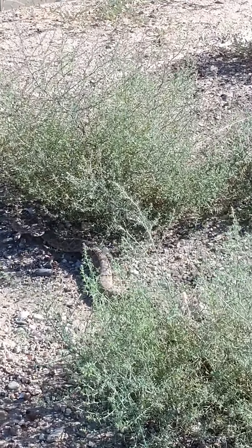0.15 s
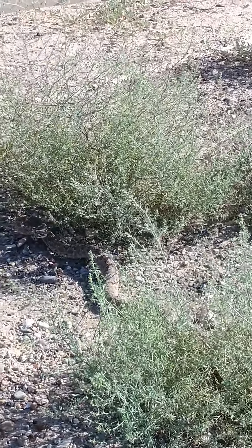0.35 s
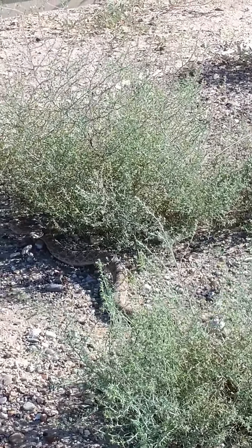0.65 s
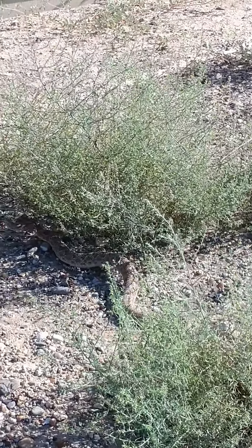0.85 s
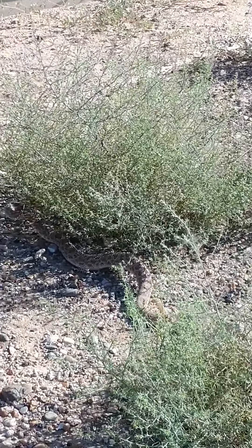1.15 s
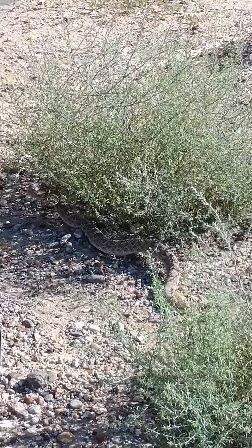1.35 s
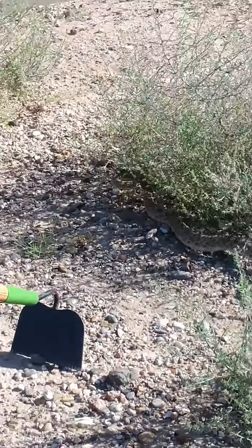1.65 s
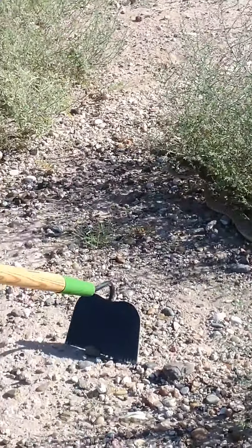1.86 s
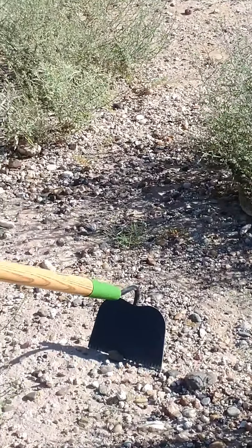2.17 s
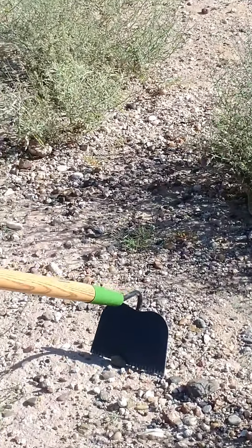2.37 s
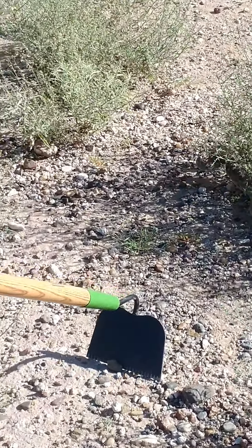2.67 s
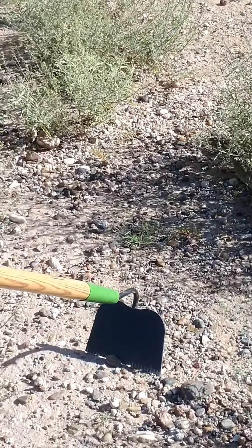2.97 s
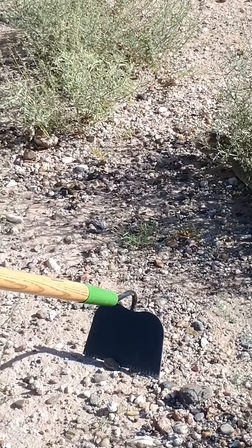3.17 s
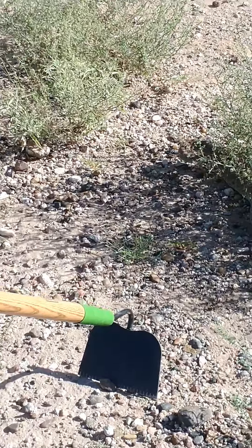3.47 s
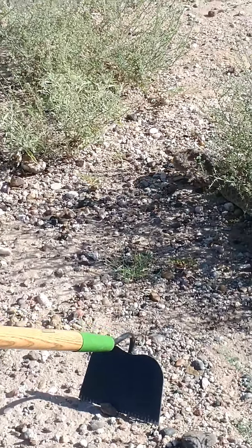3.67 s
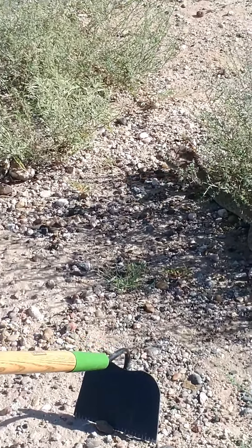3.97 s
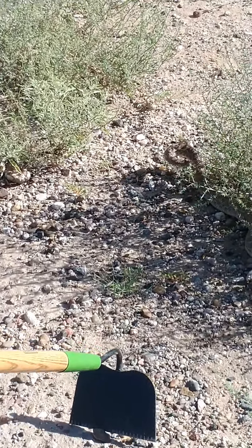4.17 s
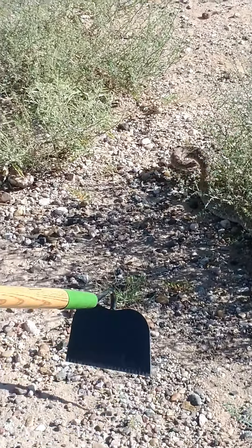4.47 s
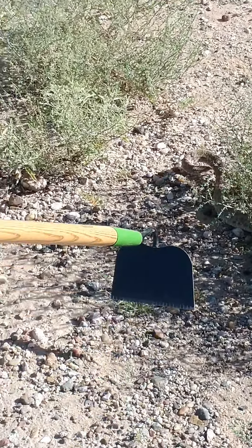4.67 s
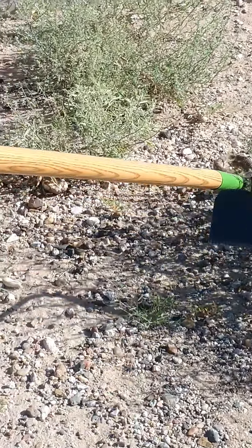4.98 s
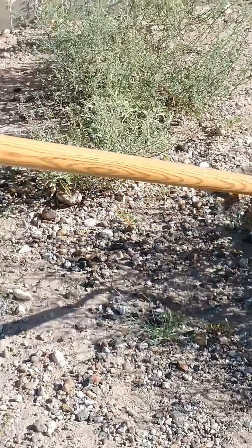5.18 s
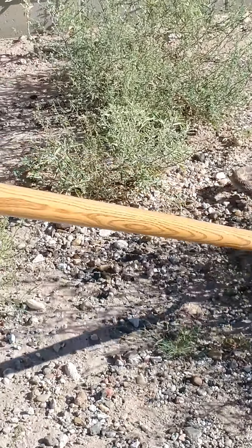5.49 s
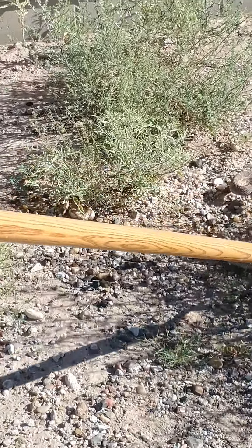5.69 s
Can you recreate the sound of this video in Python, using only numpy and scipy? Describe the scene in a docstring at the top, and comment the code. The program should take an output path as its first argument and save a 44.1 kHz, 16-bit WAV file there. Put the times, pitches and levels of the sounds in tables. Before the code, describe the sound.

Steady dry, shrill snake rattle, close and bright, with scattered stone clicks, brief gravel crunches and soft wooden handle knocks.

```python
"""A rattlesnake under a desert bush shakes its rattle a couple of metres from a hand-held phone.
Hollow horn segments clack twice per tail swing: random impacts follow the swing into a resonant, dense buzz,
which twigs and ground scatter as the phone turns. Gravel clicks as dying bursts and crunches as crowds of grains
under feet, a tool handle knocks softly in a few decaying modes, and a low distant rumble of filtered noise,
with a far engine drone in narrow bands, fills the open air."""
import sys
import numpy as np
from scipy import signal
from scipy.fft import rfft, irfft, next_fast_len
from scipy.io import wavfile
from scipy.ndimage import uniform_filter1d, map_coordinates

SR = 44100
rng = np.random.default_rng(int(sys.argv[2]) if len(sys.argv) > 2 else 0)


def dump_mix(stems):
    """Bounce the given channels to the path in sys.argv[1] as a 16-bit WAV at rate SR."""
    frames = np.atleast_2d(stems).T  # one column per channel
    limited = np.clip(frames, -1, 1)  # hard clip at full scale
    pcm = np.round(limited * 32767).astype(np.int16)
    wavfile.write(sys.argv[1], SR, pcm)


def gain_from_decibels(decibels):
    """Convert decibel values to linear amplitude factors."""
    exponent = np.asarray(decibels, float) / 20
    return 10 ** exponent


N = 257390
T = np.arange(N) / SR
M = next_fast_len(N + 4096)
HZ = np.arange(M // 2 + 1) * SR / M

# how the phone points: [t/s, left minus right/dB, phase by which the left leads at 5500 Hz/rad]
PHONE_AIM = [(0, 4.6, -1.3), (.7, 6.2, -1.3), (1.2, 4.4, -2.3), (1.9, 3.6, -2.5), (2.8, 3.9, -2.5),
             (3.5, 5.7, -1.8), (3.9, 3.9, -2), (4.6, 3.7, -1), (5.15, 5.9, -1.4), (5.84, 3, -2.7)]


def level(x, db):
    """Root-mean-square normalisation: scale to a level in dB, fixed or moving."""
    return x * gain_from_decibels(db) / np.sqrt(np.mean(x ** 2))


def along(table, column=1):
    """Logarithmic frequency scale: read a table column at every frequency, straight between its rows."""
    rows = np.array(table, float)
    return np.interp(np.log(HZ + 1), np.log(rows[:, 0] + 1), rows[:, column])


def shape(x, gain):
    """Linear filtering: multiply the spectrum by a gain at every frequency."""
    return irfft(rfft(x, M) * gain, M)[..., :N]


def walk(rate):
    """Slow random modulation: levels held 1 / rate s and slewed twice; spread near 1."""
    k = int(SR / rate)
    held = np.repeat(rng.standard_normal(N // k + 1), k)
    return 1.595 * uniform_filter1d(uniform_filter1d(held, k), k)[:N]


def clicks(per_s, spread_db):
    """Random impact process: chance hits of nearly even strength and random sign."""
    hit, size, sign = rng.random((3, N))
    strength = gain_from_decibels(-spread_db * np.log(size + 1e-9))
    return (hit < per_s / SR) * strength * np.sign(sign - .5)


def scattered(x, t60, turn_rate, count=4):
    """Multiple scattering: decaying echoes off twigs and stones, whose pattern shifts as the phone turns."""
    t = np.arange(2048) / SR
    echoes = rng.standard_normal((count, 2048)) * np.exp(-np.log(1000) * t / t60)
    echoes = echoes / np.sqrt(np.sum(echoes ** 2, 1, keepdims=True))
    paths = shape(x, rfft(echoes, M))
    weights = np.array([walk(turn_rate) for _ in range(count)])
    return np.sum(weights * paths, 0) / np.sqrt(np.sum(weights ** 2, 0))


def tail_beat():
    """Periodic excitation: a clack at each end of the swing, one end harder than the other."""
    # pace of the tail, two clacks per swing: [t/s, clack rate/Hz]
    pace = [(0, 146), (1.1, 145), (1.7, 149), (2.4, 146), (3.0, 143), (3.4, 146), (4.2, 140), (4.45, 142),
            (4.6, 157), (5.3, 159), (5.84, 150)]
    rate = np.interp(T, *np.transpose(pace)) * (1 + .025 * walk(20))
    phase = 2 * np.pi * np.cumsum(rate) / SR
    return 1.5 * np.tanh(1.5 * (np.cos(phase) + .6 * np.cos(phase / 2) + .4))


def segment_spectrum():
    """Impact and resonance: loose segments strike, their horn colours the sound, each port hears its own mix."""
    # resonant colour of the segments at the two ports: [f/Hz, left relative level/dB, right relative level/dB]
    shell = [(2500, -25, -23), (3500, -43, -22), (3680, -38, -30.5), (4660, -19.5, -21), (5150, -7, -13),
             (5355, 0, -5), (5960, -3, -7), (6040, -5.5, -11), (6710, -17, -13.5), (7610, -18, -16.5),
             (8500, -19.5, -15), (9000, -22, -21), (9340, -33.5, -26), (11600, -42, -38.5),
             (13900, -37, -31), (17200, -35.5, -40)]
    # phase between the ports apart from the aim: [f/Hz, phase by which the left leads/rad]
    port_lead = [(2500, 1.2), (4600, 1.2), (5500, 0), (6000, -.6), (8400, -.6), (10200, -5), (12000, -11),
                 (15300, -19)]
    # share that differs between the ports, other segments and twig echoes: [f/Hz, level against direct/dB]
    scatter_share = [(2500, 3), (4500, -5), (5600, -7), (6200, -2), (6600, 4), (7600, -1), (9000, 2),
                     (15000, 3)]
    hits, *others = (clicks(6000., .35) * gain_from_decibels(.3 * walk(25)) for _ in range(3))
    # nearby stems comb the ring alike for both ports; their echo is dull
    dull = .5 / (1 + (HZ / 7000) ** 8)
    hits = hits + shape(scattered(hits, .045, 1.5, count=3), dull)
    s, _, lead = np.transpose(PHONE_AIM)
    shift = np.interp(T, s, lead) / (4 * np.pi * 5500) * SR  # samples each port moves as the phone turns
    direct = np.array([map_coordinates(hits, [np.arange(N) + side * shift], order=5) for side in (1, -1)])
    apart = np.array([.3 * scattered(hits, .03, 3.) + .9 * other for other in others])
    share = gain_from_decibels(along(scatter_share))
    bass_cut = np.minimum(HZ / 3904.0, 1) ** 12
    colour = gain_from_decibels(np.array([along(shell, column=1), along(shell, column=2)])) * bass_cut
    ports = np.exp(1j * np.outer([.5, -.5], along(port_lead)))
    return (rfft(direct, M) * ports + share * rfft(apart, M)) / np.sqrt(1 + share ** 2) * colour


def ring_out(spectrum):
    """Narrow-band resonance: segments ring out, or cancel below 0 dB, while tail and phone hold one pose."""
    # [start t/s, end t/s, f/Hz, width/Hz, left gain/dB, right gain/dB]
    poses = [(0, .9, 3680, 250, -8, -14), (0, 0.885, 4660, 200, -1, -0.5), (0, 0.845, 4320, 157, 8, 2.5),
             (0.143, 0.86, 5080, 240, 1, -0.5), (0, 0.25, 4960, 149, 3, 4.5),
             (0, 1.453, 5805, 164, 7.5, 6.5), (0, 1, 4440, 120, -10, -3), (0, 0.902, 5600, 112, -8, -3),
             (0, 0.922, 5980, 335, -13.5, -10), (0, .9, 6740, 406, 7.5, 5.5), (0, 1.4, 6450, 120, 2.5, 3),
             (0, 0.902, 8550, 302, -1, 6), (.3, .88, 8600, 300, -4.5, 2), (1.39, 3.85, 5420, 208, 8, 7.5),
             (1.497, 3.793, 5300, 156, -0.5, 4.5), (1.71, 3.64, 6180, 298, 2.5, 3.5),
             (3.3, 5.304, 6010, 131, -3.5, -15), (3.397, 3.845, 6500, 195, 9.5, 9.5),
             (3.595, 5.3, 6400, 149, -5, 3), (1.5, 3.3, 6530, 228, 1, 0.5),
             (1.502, 3.3, 8950, 200, 5, -5.5), (3.844, 4.263, 5660, 204, 5, 5),
             (4.147, 5.355, 5460, 268, 1, 2), (3.64, 4.13, 7150, 250, 10.5, 3),
             (3.4, 5.25, 8400, 250, 5.5, 4), (4.36, 4.998, 6830, 194, 9.5, -1),
             (2.3, 5.3, 9165, 110, 6.5, 7)]
    pose_change_s = 0.14
    out = irfft(spectrum, M)[:, :N]
    for start, end, hz, width, *db in poses:
        held = np.clip(np.minimum(T - start, end - T) / pose_change_s + .5, 0, 1)
        band = irfft(spectrum / (1 + (2 * (HZ - hz) / width) ** 2), M)[:, :N]
        out = out + held * (gain_from_decibels(np.array(db))[:, None] - 1) * band
    return rfft(out, M)


def band_levels():
    """Spectral envelope: times and the levels of six bands, from the lowest up, before the overall gain."""
    # the three main bands: [t/s, ring level/dB, low flank level/dB, treble level/dB]
    main_bands = [(0, -37.5, -56, -59.5), (.08, -40.5, -48, -61.5), (.25, -48, -49, -60.5),
                  (.4, -44.5, -48, -59), (.6, -42.5, -43, -59), (.8, -37.5, -45, -58),
                  (.845, -44, -55, -57), (.88, -55, -54.5, -64), (1.04, -58.5, -59, -62.5),
                  (1.17, -46, -59, -58), (1.4, -49, -55, -63.5), (1.55, -44.5, -55, -58.5),
                  (1.8, -51.5, -56.5, -62), (2.0, -49, -55.5, -61), (2.35, -47.5, -57.5, -60),
                  (2.5, -47.5, -59, -60), (2.65, -52.5, -58.5, -58.5), (3.0, -44, -56.5, -58),
                  (3.27, -45.5, -56.5, -58), (3.5, -42.5, -48.5, -56.5), (3.65, -40.5, -49.5, -58),
                  (3.8, -43.5, -59.5, -59), (3.92, -48, -58.5, -58), (4.05, -39.5, -55, -57),
                  (4.12, -36.5, -51, -57.5), (4.19, -39, -50.5, -60.5), (4.35, -36.5, -47, -56.5),
                  (4.58, -35, -49, -55.5), (4.68, -38.5, -52.5, -56), (4.8, -38.5, -49, -53.5),
                  (4.95, -36.5, -43, -55), (5.24, -38, -49.5, -57.5), (5.3, -46, -57, -64),
                  (5.5, -43, -50.5, -65.5), (5.6, -48.5, -58, -63.5), (5.75, -54.5, -60.5, -67.5),
                  (5.84, -41.5, -58, -61.5)]
    # extra level of the lowest band and the upper flank: [t/s, lowest band level/dB, upper flank level/dB]
    extra_levels = [(0, 1, 1), (.7, -1, 2), (1.2, 1, -2), (1.6, -2.5, 2), (2.6, -0.5, -1.5), (3.1, -3, 1.5),
                    (3.6, -5, -0.5), (3.85, 1.5, 6.5), (4.3, 0.5, -3), (4.75, -4.5, 3), (5.0, -5, -5.5),
                    (5.3, 1.5, 2.5), (5.84, -2.5, -1)]
    s, ring, low, treble = np.transpose(main_bands)
    when, foot_db, upper_db = np.transpose(extra_levels)
    # the lowest band follows the low flank, more steeply
    foot = -59 + 1.23 * (low + 48.5) + np.interp(s, when, foot_db)
    sizzle = treble + 2
    # the upper flank lies between ring and sizzle
    upper = -0.5 + .33 * ring + (1 - .33) * sizzle + np.interp(s, when, upper_db)
    return s, (foot, low, ring, upper, sizzle, treble)


def even_strokes(x, throw_db=3.5):
    """Amplitude limitation: a segment can only swing so far, so strokes even out above the running level."""
    power = np.mean(x ** 2, 0)
    stroke = uniform_filter1d(uniform_filter1d(power, size=40), size=40) / uniform_filter1d(power, size=3000)
    return x * (1 + (stroke * gain_from_decibels(-2 * throw_db)) ** 2) ** -.2


def brief_fades():
    """Envelope modulation: the rattle briefly fades and swells back, in dB."""
    # [deepest t/s, fading time/s, recovery time/s, depth level/dB]
    dips = [(4.14, 0.02, 0.031, -17), (5.273, 0.016, 0.025, -13.5), (5.395, 0.017, 0.017, -9.5),
            (5.535, 0.032, 0.03, -10.5), (5.61, 0.044, 0.034, -11.5), (5.685, 0.049, 0.012, -12)]
    return sum(np.interp(T, (at - fading, at, at + recovery), (0, db, 0))
               for at, fading, recovery, db in dips)


def rattle():
    """Amplitude-modulated resonant noise: bunched segment impacts beat in six bands with the tail."""
    # edges between the six bands: [f/Hz]
    edges_hz = [4500, 5150, 6020, 6900, 9600]
    # depth of the beat from the lowest band up; the thin treble sizzles evenly: [level per unit beat/dB]
    beat_depths = [1.0, 1.9, 2.1, 1.3, .9, .4]
    beat = tail_beat()
    spectrum = ring_out(segment_spectrum())
    above = [1, *(1 / (1 + (edge / (HZ + 1)) ** 60) for edge in edges_hz), 0]
    s, levels = band_levels()
    out = 0
    # the ground echo and the turning phone favour now one part of the spectrum, now another
    for a, b, db, depth_db in zip(above, above[1:], levels, beat_depths):
        part = irfft(spectrum * (a - b), M)[:, :N]
        waver_db = .8 * walk(16)  # each part wavers on its own
        out = out + level(part, np.interp(T, s, db) + depth_db * beat + waver_db)
    out = even_strokes(out)
    s, pan_db, _ = np.transpose(PHONE_AIM)
    turn_db = .5 * (np.interp(T, s, pan_db) - pan_db.mean())
    return out * gain_from_decibels(1 + brief_fades() + np.array([turn_db, -turn_db]))


def shuffle():
    """Energy summation: power of middle, coarse and sand grains under shifting feet, creep plus scuffs."""
    # slow creep of the gravel: [t/s, middle grain level/dB, sand level/dB]
    creep = [(0, -78, -79), (0.297, -87, -80), (0.748, -78.5, -79), (1.1, -82.5, -68.5),
             (1.398, -72.5, -71), (1.9, -73, -71.5), (2.3, -78.5, -73), (2.549, -72, -70.5),
             (3.1, -71.5, -73.5), (3.3, -69, -72.5), (3.602, -68.5, -70.5), (3.85, -76, -73.5),
             (4.2, -77, -83), (4.555, -71.5, -73), (4.902, -78, -75), (5.104, -84.5, -91),
             (5.402, -76, -73), (5.84, -87, -76.5)]
    # [start t/s, length/s, middle level/dB, coarse level against middle/dB, sand level against middle/dB]
    scuffs = [(1.231, .065, -70, 6, 3), (1.545, .07, -74.5, 7, -8), (2.849, .02, -67.5, -21, -12),
              (3.285, .04, -71.5, -15, 3), (4.278, 0.037, -61.5, -10, -6), (4.346, .045, -64.5, -11, -11.5),
              (4.426, .025, -66.5, -5, -10), (5.226, .04, -65, 0.5, -2)]
    attack_s, release_s = 0.0057, 0.028
    s, middle, sand = np.transpose(creep)
    coarse = middle - 5.5
    power = gain_from_decibels(2 * np.array([np.interp(T, s, db) for db in (middle, coarse, sand)]))
    for start, length, db, coarse_db, sand_db in scuffs:
        before, after = np.minimum(T - start, 0), np.maximum(T - start - length, 0)
        envelope = np.exp(before / attack_s - after / release_s)
        power = power + gain_from_decibels(2 * (db + np.array([[0], [coarse_db], [sand_db]]))) * envelope ** 2
    return power


def crunch(lead_s=.00044, left_db=1.4):
    """Granular friction: countless grains of three sizes slip in shared patches, reaching the left first."""
    # middle, coarse and sand grains: [f/Hz, width/Hz, grain rate/Hz, size spread level/dB]
    grain_sizes = [(1380, 750, 1800, 2), (680, 600, 1500, 2), (2950, 1200, 6000, 1.5)]
    ports = np.exp(1j * np.pi * lead_s * np.outer([1, -1], HZ)) * gain_from_decibels(np.array([[left_db], [-left_db]]))
    out, patches = 0, gain_from_decibels(1.6 * walk(30) + 1.2 * walk(12))
    for (hz, width, per_s, spread_db), power in zip(grain_sizes, shuffle()):
        grains = clicks(per_s, spread_db) * patches
        ring = 1 / (1 + 1j * (HZ - hz ** 2 / (HZ + 1)) / width) ** 2
        echoes = np.array([scattered(grains, 0.02, 2.6, count=2) for _ in range(2)])
        heard = shape(grains, ports * ring) + shape(echoes, .35 * ring)
        out = out + level(heard, 0) * np.sqrt(power)
    return out


def air(split_hz=350., knee_hz=200.):
    """Partly coherent noise: a swelling distant rumble and a faint even hiss; the bass is alike at both ports."""
    # colour of the noise within each band: [f/Hz, relative level per Hz/dB]
    air_colour = [(15, -65), (30, -2), (60, 7.5), (87, 5.5), (149, 1.5), (192, -3.5), (291, -16),
                  (450, -23.5), (531, -21.5), (875, -21.5), (1100, -23), (2100, -24.5), (3050, -19.5),
                  (3600, -11.5), (4680, -21), (7920, -120)]
    # likeness of left and right: [f/Hz, likeness 0-1]
    likeness = [(60, 0.86), (300, 0.76), (700, 0.7), (2000, 0.2)]
    # swell of the rumble: [t/s, level below the knee/dB, level above it/dB]
    swell = [(0, -76.5, -71.5), (.47, -77.5, -82.5), (.85, -75.5, -73.5), (1.3, -74, -79), (2, -75.5, -81),
             (2.55, -73, -79.5), (3.5, -75.5, -78.5), (4.15, -72.5, -76), (5.3, -72.5, -79.5),
             (5.84, -75, -79.5)]
    alike = np.clip(along(likeness), 0, 1)
    mid, side = (rfft(rng.standard_normal(N), M) * gain_from_decibels(along(air_colour)) * np.sqrt(1 + sign * alike)
                 for sign in (1, -1))
    both = mid + side * np.array([[1], [-1]])
    low = 1 / (1 + (HZ / split_hz) ** 8)
    deep = 1 / (1 + (HZ / knee_hz) ** 8)
    below, above, hiss = (irfft(both * part, M)[:, :N] for part in (deep, low - deep, 1 - low))
    s, below_db, above_db = np.transpose(swell)
    rumble = level(below, np.interp(T, s, below_db)) + level(above, np.interp(T, s, above_db))
    return rumble + level(hiss, -71.5)


def drone():
    """Narrow-band noise: wavering bands of a far engine, the same at both ports."""
    # [f/Hz, width/Hz, level/dB]
    hum = [(89.1, 8.4, -78.5), (151.6, 12, -84)]
    return sum(level(shape(rng.standard_normal(N), 1 / (1 + (2 * (HZ - hz) / width) ** 2)), db)
               for hz, width, db in hum)


def knocks():
    """Modal vibration: a soft, slightly gritty push of a few milliseconds rings the wooden handle."""
    # [t/s, level/dB, upper against lower of the two deep modes/dB, high modes level/dB]
    pushes = [ (.04, -69, 0, 4), (.058, -73, -4, 7), (.672, -70, -4, 0), (.69, -68, 6, -3),
              (1.243, -69, 6, -8), (1.262, -73, 6, -8), (5.3, -73, 7, -8)]
    # modes of the handle: [f/Hz, level/dB, 60 dB decay time/s]
    modes = [(538, 1, 0.083), (641, 0, 0.1), (1370, -5, 0.082), (1539, -1, 0.15), (2240, -7, 0.12)]
    out, t = np.zeros(N), T[:8192]
    onset = 1 - np.exp(-t / 0.0016)
    for (s, db, deep_db, high_db), grit in zip(pushes, rng.standard_normal((len(pushes), 256))):
        grip_db = (-deep_db / 2, deep_db / 2, high_db, high_db, high_db)
        ring = 0
        for (hz, mode_db, t60), g in zip(modes, grip_db):
            ring = ring + gain_from_decibels(mode_db + g) * np.exp(-np.log(1000) * t / t60) * np.sin(2 * np.pi * hz * t)
        push = np.r_[1, .04 * grit[1:]]
        start = int(s * SR)
        out[start:start + 8192] += gain_from_decibels(db) * np.convolve(ring * onset, push)[:8192]
    return out


def burst(cycles, decay, twist):
    """Damped oscillation: a contact that builds and dies within a few cycles; peak near 1."""
    return np.e * cycles / decay * np.exp(-cycles / decay) * np.sin(2 * np.pi * cycles + twist)


def pebbles(count=24):
    """Inhomogeneous random process: small stones fall by chance, most often where the gravel is busy."""
    busy = np.cumsum(shuffle()[0][:N - 4096] ** 0.68)
    rows = []
    for w, size, pitch in rng.random((count, 3)):
        s = np.searchsorted(busy, w * busy[-1]) / SR + .002
        db = -57 + 3 * (2 * size - 1)
        hz = 1500 * 2 ** (.35 * (2 * pitch - 1))
        rows.append((s, db, hz, -18, -19))  # columns as for the single stones
    return rows


def stones(thud_hz=400., tick_hz=3000., left_db=1.3):
    """Damped impact response: each stone gives a few dying cycles, a thud, a tick and two small bounces."""
    # [t/s, level of the dying cycles/dB, f/Hz, thud level against them/dB, tick level against them/dB]
    single_stones = [(.645, -59, 1700, -30, -23), (1.0192, -51, 1110, -7.5, 4),
                     (1.2342, -54, 920, -11, -2.5), (1.443, -45.5, 1110, -5.5, -3),
                     (1.5285, -50, 820, -7, -5), (1.5505, -49, 627, -26, -15),
                     (1.5572, -35.5, 770, -4.5, -9), (1.5718, -42, 920, -12, -6),
                     (1.5975, -49.5, 910, -12, -15), (1.608, -55, 950, -7, -15),
                     (1.6651, -43.5, 940, -10, -5), (1.8166, -47.5, 1290, -17, -4),
                     (1.882, -51, 890, -6.5, 2), (1.9104, -48, 1610, -11.5, -6),
                     (2.8608, -46, 1480, -27, -20), (3.2618, -46.5, 1340, -13, -5),
                     (3.305, -39, 1180, -21.5, -16), (3.402, -47, 1370, -25, -4),
                     (3.5201, -41.5, 1300, -27, -9), (3.5625, -48, 1430, -19, -12),
                     (3.6018, -47.5, 1580, -21, -12), (3.619, -51, 1710, -26, -8),
                     (4.0545, -38.5, 1350, -13.5, -13), (4.115, -49, 1500, -12, -10),
                     (4.202, -46.5, 1110, -14.5, -3), (4.287, -52, 1500, -25, -6),
                     (4.293, -58, 1900, -25, -4), (4.2985, -42, 1190, -13, -3), (4.302, -36, 1050, -24, -2),
                     (4.308, -35.5, 1320, -24, 0), (4.312, -51, 1600, -25, 10), (4.3165, -53, 2500, -30, 2),
                     (4.3475, -39.5, 1440, -20, -1), (4.35, -45, 2600, -29, 3),
                     (4.3635, -28.5, 1260, -26, -7), (4.371, -34, 1190, -32, -5),
                     (4.3745, -50, 2600, -30, -3), (4.381, -44, 1200, -19, -4), (4.388, -58, 1800, -18, -4),
                     (4.4493, -45, 1320, -19, -23), (4.557, -50, 1010, -20, -18),
                     (4.574, -51, 1500, -23, -15), (4.6108, -54, 1790, -18, 10),
                     (4.6571, -52, 1890, -22, -4), (4.6794, -45.5, 1830, -27, 2),
                     (4.733, -56, 1690, -20, -6), (4.8539, -49, 1797, -26, 5),
                     (4.8618, -45.5, 1760, -24, -12), (4.9188, -44.5, 1780, -20, -2),
                     (5.213, -52, 1600, -18, 0), (5.2365, -43, 1500, -18.5, -11),
                     (5.241, -50, 2180, -13, -7), (5.2495, -53, 700, -9, -7), (5.2525, -55.5, 240, 3, -9),
                     (5.4409, -53, 1320, -24, -6)]
    out, t = np.zeros((2, N + 2048)), np.arange(2048) / SR
    rows = single_stones + pebbles()
    for (s, db, hz, thud_db, tick_db), chance in zip(rows, rng.random((len(rows), 5))):
        # the left port comes first; the more a stone thuds, the nearer straight ahead
        lead_ms = min(.2 - .012 * thud_db, .44)
        bounces = ((0.00222 + 0.00315 * chance[2], -13), (0.012 + 0.015 * chance[3], -21))  # s, dB
        bounce_hz = hz * (.85 + .4 * chance[4])
        for c, side in enumerate((1, -1)):
            since = np.maximum(t - .001 + side * lead_ms / 2000, 0)
            knock = burst(since * hz, .6, chance[0])
            knock += gain_from_decibels(tick_db) * burst(since * tick_hz, 0.49, 6 * chance[1])
            knock += gain_from_decibels(thud_db) * burst(since * thud_hz, 0.33, 0)
            for delay, db_down in bounces:
                knock += gain_from_decibels(db_down) * burst(np.maximum(since - delay, 0) * bounce_hz, .75, 0)
            start = int((s - .001) * SR)
            out[c, start:start + 2048] += gain_from_decibels(db + side * left_db) * knock
    return out[:, :N]


def scene():
    """Superposition: everything that reaches the two ports adds."""
    return rattle() + crunch() + air() + drone() + knocks() + stones()


def top_cut(x):
    """Nothing passes above the cut-off."""
    return signal.sosfilt(signal.butter(12, 15730, fs=SR, output="sos"), x)


def record(dry):
    """High-pass response: the microphone drops the deepest bass, second order at 60 Hz."""
    bass_drop = 1 / (1 - 1j * 60. / (HZ + 1)) ** 2
    mix = shape(dry, bass_drop)
    return top_cut(mix)


dry = scene()
out = record(dry)
dump_mix(out)
```